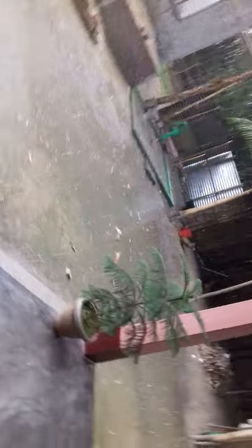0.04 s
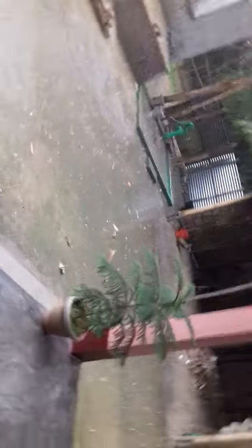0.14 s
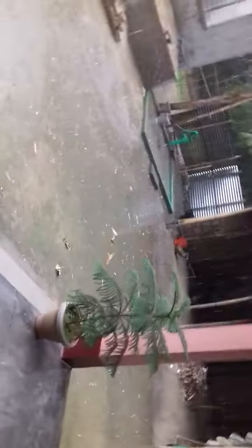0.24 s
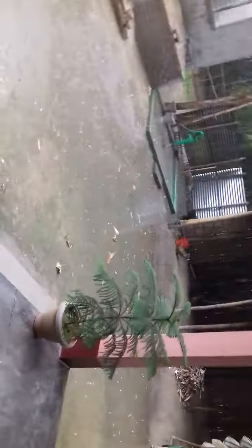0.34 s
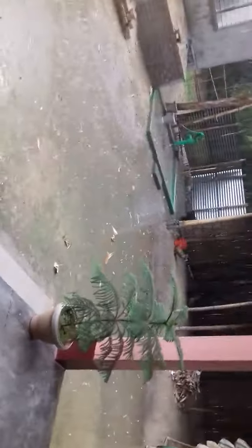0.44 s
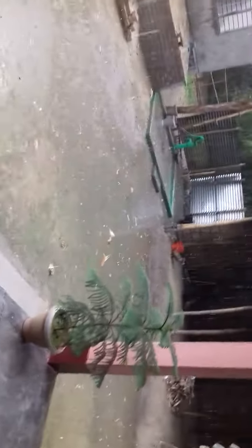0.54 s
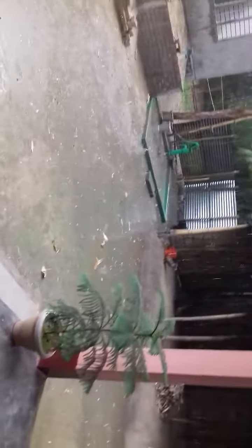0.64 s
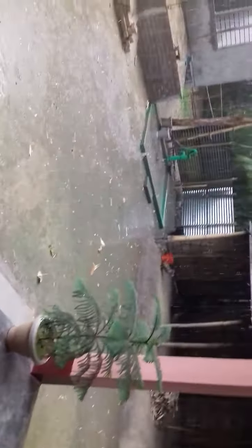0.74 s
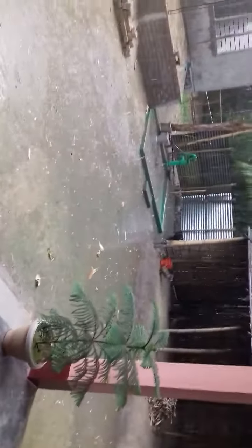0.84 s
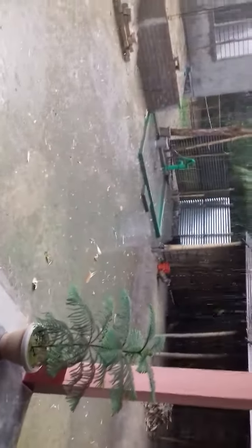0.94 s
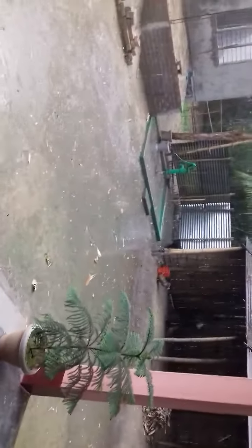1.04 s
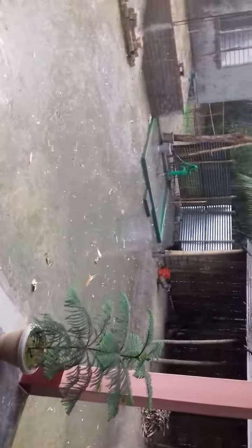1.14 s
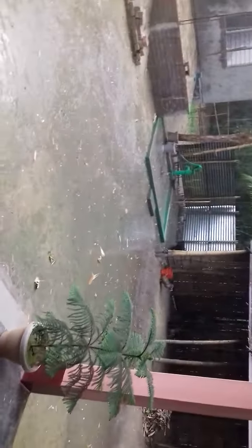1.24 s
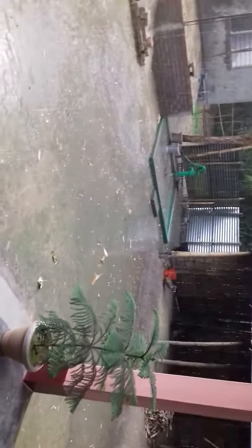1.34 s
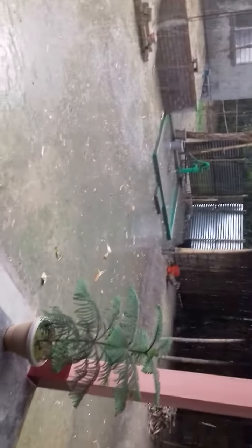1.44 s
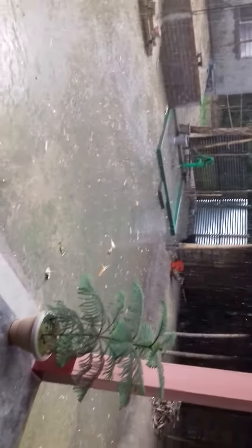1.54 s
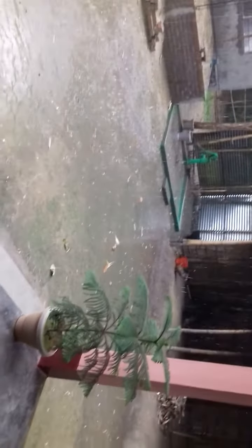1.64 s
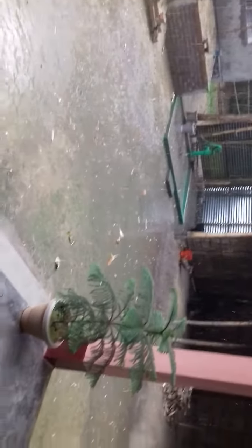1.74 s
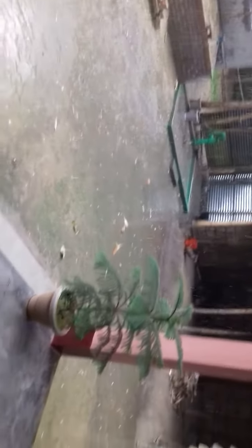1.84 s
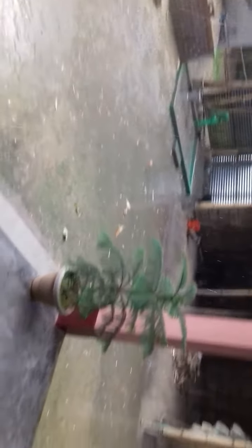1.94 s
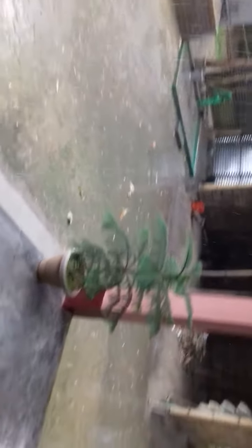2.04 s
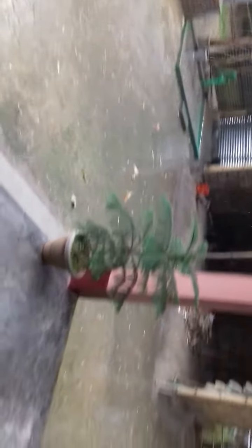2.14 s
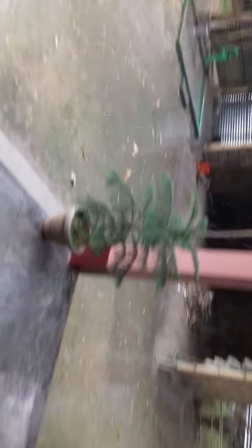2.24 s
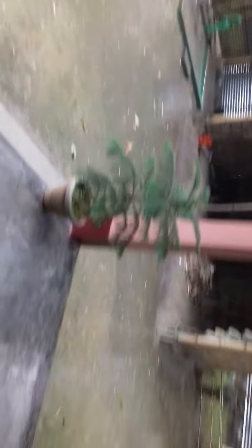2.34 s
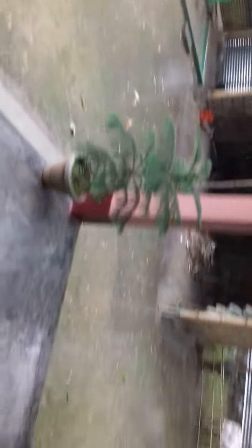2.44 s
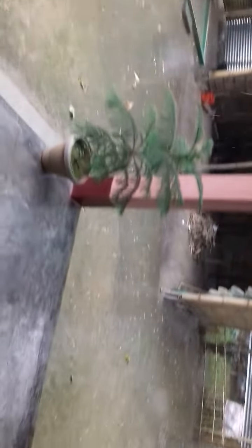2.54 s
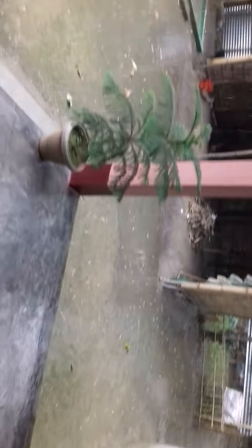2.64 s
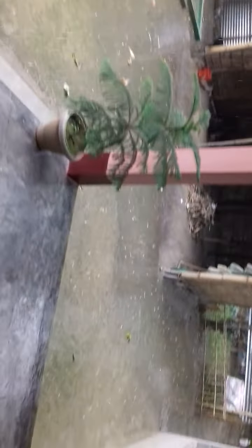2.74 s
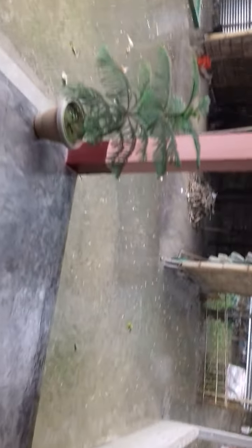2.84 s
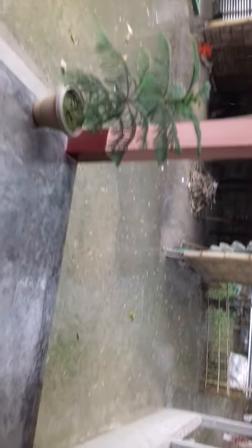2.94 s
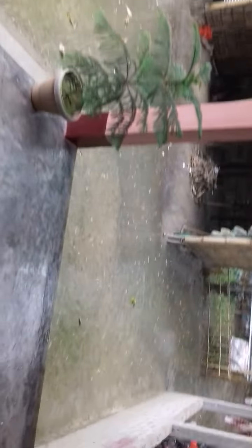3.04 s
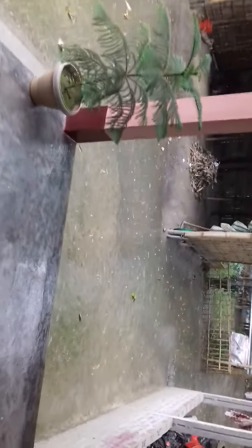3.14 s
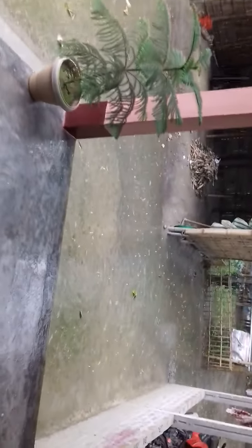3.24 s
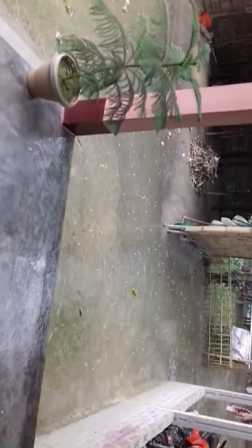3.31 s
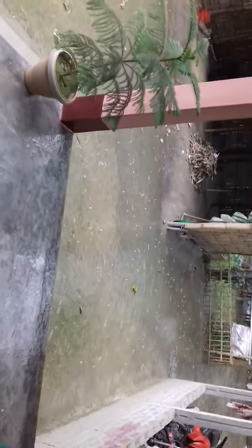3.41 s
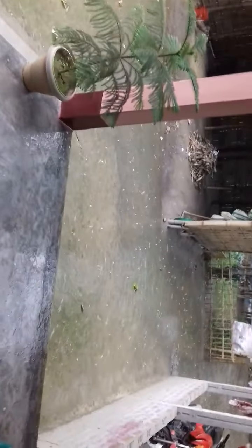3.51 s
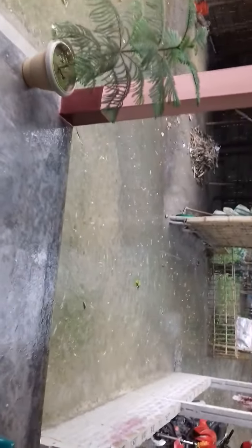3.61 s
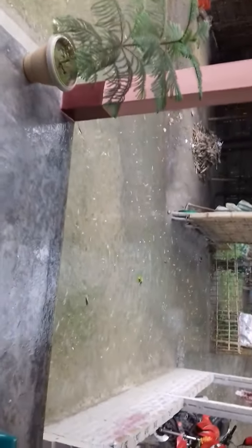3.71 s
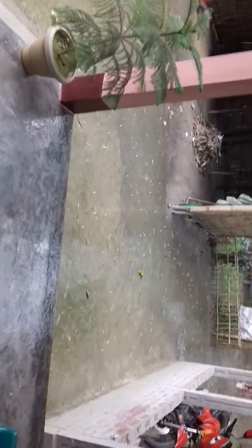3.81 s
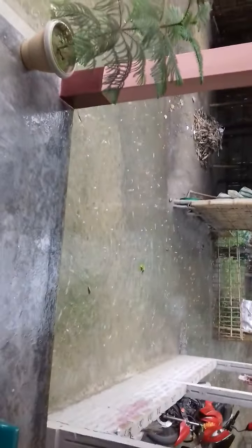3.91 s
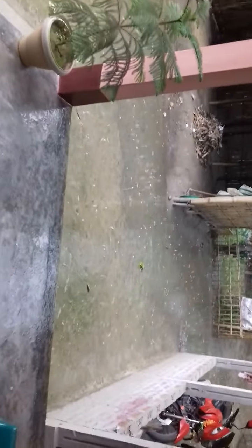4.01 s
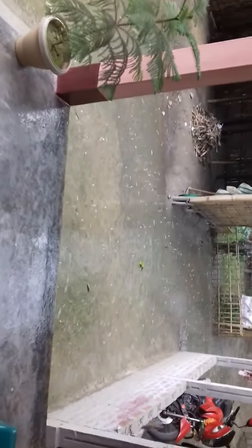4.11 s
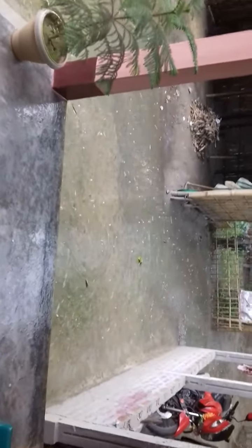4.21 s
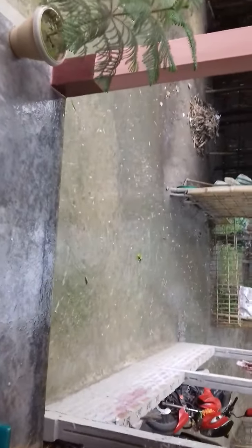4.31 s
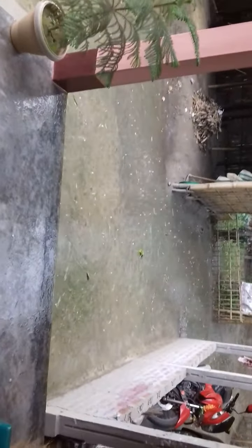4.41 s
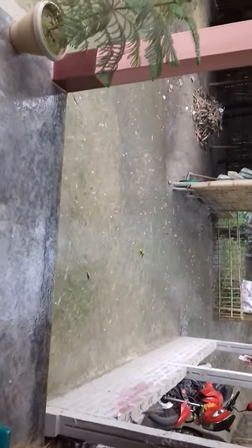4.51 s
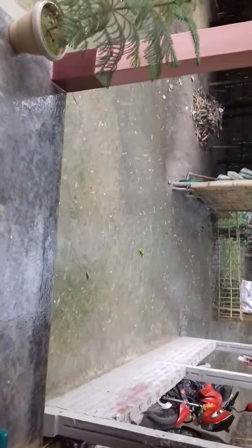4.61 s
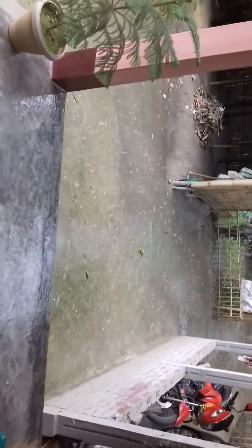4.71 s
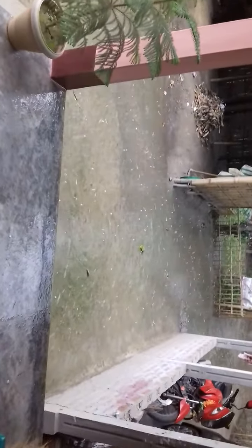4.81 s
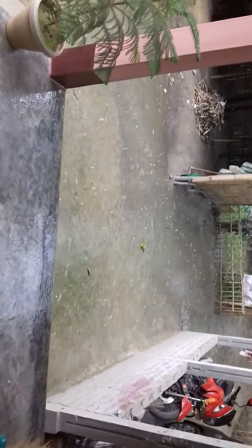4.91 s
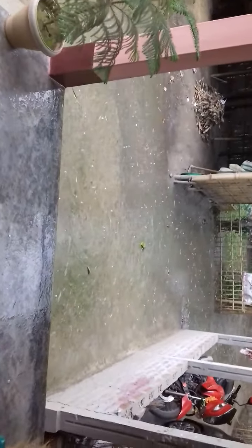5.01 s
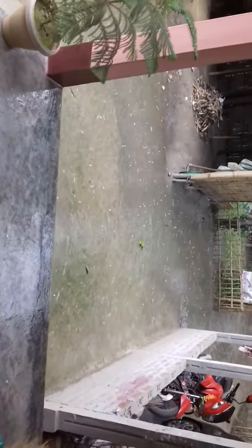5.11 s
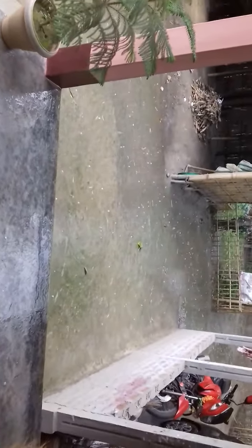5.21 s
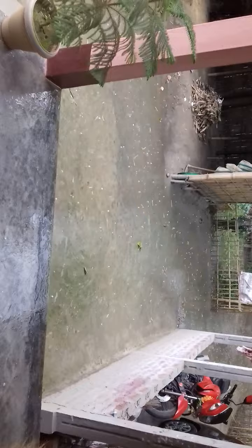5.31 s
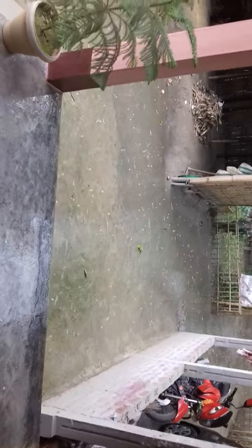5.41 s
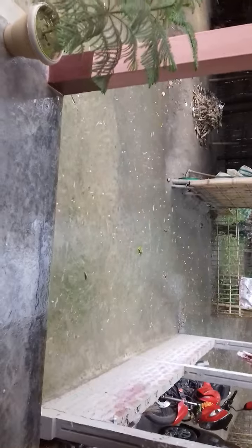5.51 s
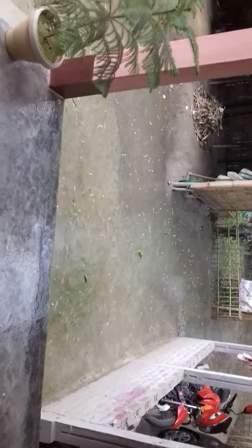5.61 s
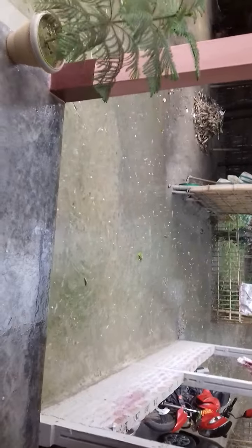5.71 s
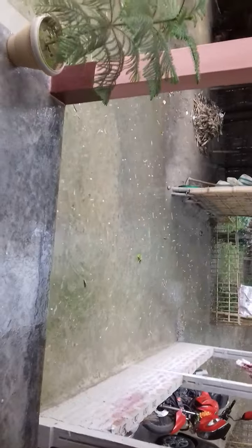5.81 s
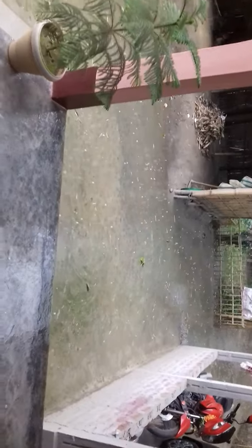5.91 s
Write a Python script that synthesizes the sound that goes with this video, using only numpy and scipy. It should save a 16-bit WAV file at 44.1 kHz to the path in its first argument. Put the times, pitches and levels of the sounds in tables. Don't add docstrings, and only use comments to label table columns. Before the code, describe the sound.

Heavy rain roars steadily while hailstones crack and ring on a sheet-metal roof close overhead, with sharp ticks on concrete and dull thuds beyond.

```python
import sys
import numpy as np
from scipy import signal
from scipy.fft import rfft, irfft, next_fast_len
from scipy.io import wavfile
from scipy.ndimage import uniform_filter1d, minimum_filter1d

SR = 44100
rng = np.random.default_rng(int(sys.argv[2]) if len(sys.argv) > 2 else 0)


def transcribe(u):
    v = np.clip(np.atleast_2d(u).T, -1, 1)
    q = np.round(v * 32767).astype(np.int16)
    wavfile.write(sys.argv[1], SR, q)


def gain_from_db(level_db):
    decades = np.asarray(level_db, float) / 20
    return 10 ** decades


N = 262597
STEP = 4
RATE, STEPS = SR / STEP, -(-N // STEP)


def in_time(rows):
    s, *columns = np.transpose(rows)
    return [np.interp(np.arange(N) / SR, s, c) for c in columns]


def at_hz(points, hz):
    known, *columns = np.transpose(points)
    return [np.interp(np.log(hz), np.log(known), c) for c in columns]


def three_point(body_db, hiss_db, top_db, hz):
    knees_hz = (1800, 5690, 12530)
    body, hiss, top = (np.interp(np.log(hz), np.log(knees_hz), row) for row in np.eye(3))
    return body * (body_db + 4) + hiss * (hiss_db + 1.5) + top * (top_db + 15)


def drift(rate):
    r = np.exp(-80 * np.pi * rate / SR)
    slow = signal.lfilter([1], [1, -2 * r, r * r], rng.standard_normal(N // 40 + 2002))[2000:]
    return np.interp(np.arange(N) / 40, np.arange(len(slow)), slow / slow.std())


def dying(energy, t60):
    return signal.lfilter([1], [1, -gain_from_db(-120 / (t60 * RATE))], energy + 1e-18)


def each_dying(starts, levels_db, t60s):
    out = np.zeros(STEPS)
    after = np.arange(RATE // 4) / RATE
    for start, level_db, t60 in zip((starts * RATE).astype(int), levels_db, t60s):
        fall = np.exp(-np.log(1e6) * after[:STEPS - start] / t60)
        out[start:start + len(after)] += gain_from_db(2 * level_db) * fall
    return out


def swelling(power, seconds):
    r = np.exp(-1 / (max(seconds, 1e-4) * RATE))
    return signal.lfilter([1 - r], [1, -r], power)


def spikes(seconds, level_db):
    out = np.zeros(STEPS)
    np.add.at(out, (seconds * RATE).astype(int), gain_from_db(2 * level_db))
    return out


def mode_bump(hz, mode_hz, bump_db, octaves):
    return bump_db * np.exp(-(np.log2(hz / mode_hz) / octaves) ** 2)


# (t/s, drumming level/dB, fineness of the drops level/dB)
DOWNPOUR = [(.6, -18.5, -4), (.7, -14, -5), (1.4, -14, -4), (1.62, -16.5, -3), (1.816, -27.5, 4),
            (2.05, -19.5, -2.5), (2.3, -16, 0.5), (2.66, -16.5, -3), (2.84, -16, -2), (3.2, -20, -2),
            (3.5, -18.5, -3), (3.8, -20.5, 5.5), (4.14, -20, 2), (4.6, -18.5, -0.5), (5.0, -21.5, 1.5),
            (5.44, -20.5, 0), (5.68, -19.5, 0), (5.95, -16.5, 2.5)]


def rain_levels():
    body_db, fine_db = np.array(in_time(DOWNPOUR))[:, ::STEP]
    hiss_db = body_db - 1.4 + 0.19 * fine_db
    spray_db = body_db - 14.5 + fine_db
    return body_db, hiss_db, spray_db


def pellets(per_s, spread_db):
    sizes_db = spread_db * np.minimum(rng.exponential(1, N), 3)
    falling = (rng.random(N) < per_s / SR) * gain_from_db(2 * sizes_db)
    return np.add.reduceat(falling, np.arange(0, N, STEP))


# (f/Hz, crack t60/s, ring t60/s, swell/s)
STRUCK_SHEET = [
    (150, 0.34, 1, 0.0061),
    (1270, 0.13, 0.33, 0.014),
    (4130, 0.38, 0.58, 0.0012),
    (8000, 0.17, 0.44, 0.00071),
    (13500, 0.13, 0.35, 0.00026),
]


def sheet_at(hz):
    return at_hz(STRUCK_SHEET, hz)


def rain_power(hz, levels_db, small):
    patter = dying(small, 0.47 * sheet_at(hz)[0])
    rain_db = three_point(*levels_db, hz) - 4.0 + 2.0 * drift(7.3)[::STEP]
    clatter_db = 0.34 * np.exp(-np.log2(hz / 3300) ** 2 / .3)
    return gain_from_db(2 * (rain_db + clatter_db)) * (1 + 0.49 * patter / patter.mean())


def hum():
    return gain_from_db(-46 + 2.0 * drift(3)) * np.sin(2 * np.pi * 153.2 * np.arange(N) / SR)


def wind():
    sos = signal.butter(2, [35, 110], "band", fs=SR, output="sos")
    low = signal.sosfilt(sos, rng.standard_normal((2, N)))
    return low / low.std() * gain_from_db(-69 + 4.8 * np.array([drift(5), drift(3.4)]))


# (t/s, peak level/dB, body level/dB, top level/dB)
NEXT_SHEETS = [(.410, -9, -19, -17), (.448, -4.5, -17.5, -23), (.6774, -8, -7.5, -15),
               (1.0924, -17, -24, -11.5), (1.4197, -6, -16, -19), (1.9944, -11, -8, -18),
               (2.101, -6, -15, -13.5), (2.372, -21, -10, -21), (2.5461, -14, -19, -11),
               (3.0036, -12, -17.5, -20), (3.0294, -7, -19, -41), (3.168, -8.5, -18, -21),
               (3.2106, -7, -17, -22), (3.4284, -8.5, -14, -14.5), (3.5884, -11, -8, -20),
               (4.23, -12, -3, -15), (4.7164, -7, -9, -16), (4.8944, -10.5, -9.5, -20),
               (5.0769, -6.5, -11, -24), (5.7824, -7, -12.5, -36.5)]
# (t/s, peak level/dB, body level/dB, top level/dB)
SHEET_OVERHEAD = [(0.59, -3, -18, -17.5), (.7667, -4.5, -31, -28), (.822, -4, -39, -10),
                  (1.195, -2.5, -11, -17), (1.22, -2, -15, -19), (1.2865, -3.5, -8, -17),
                  (1.4675, -3, -20, -45), (1.5647, -3.5, -14.5, -19.5), (1.735, -2, -10, -17.5),
                  (2.2129, -5.5, -8, -11.5), (2.4414, -4, -10.5, -12.5), (2.848, -5.5, -8, -9.5),
                  (3.613, -4.5, -13, -11), (3.6915, -3, -16, -16), (3.7344, -5, -7, -21),
                  (3.9524, -4.5, -12.5, -30), (4.668, -5, -9.5, -16.5), (5.1833, -3.5, -13, -18),
                  (5.232, -5, -10, -16), (5.3281, -2.5, -6.5, -15.5), (5.86, -5, -5.5, -17)]
# (t/s, peak level/dB, body level/dB, top level/dB)
OVER_BEAM = [(.9842, -7.5, -24, -13), (1.6886, -1, -12, -16), (1.8612, -8, -13, -13.5),
             (2.866, -4.5, -11, -8), (3.383, -2.5, -10, -12.5), (3.6707, -2.5, -6, -16),
             (3.7724, -1.5, -11.5, -16), (3.823, -2.5, -8, -14.5), (3.8809, -3, -5.5, -13),
             (3.9124, -18, -26, -31), (4.093, -3.5, -14, -25), (4.186, -4.5, -8.5, -11),
             (4.4014, -5, -14.5, -23), (4.42, -5.5, -26, -13), (4.456, -4, -12, -25),
             (4.4864, -8.5, -19, -13), (4.5714, -8, -7, -14), (5.0394, -14, -12, -14),
             (5.3633, -2, -32, -13.5), (5.6138, -3, -5, -14), (5.7084, -8, -27, -20)]


def stones():
    places = ((SHEET_OVERHEAD, -4), (OVER_BEAM, -30), (NEXT_SHEETS, 1.5))
    return np.array([(*row, ring_db) for rows, ring_db in places for row in rows])


def hail_power(hz, mode_hz, chance_db):
    s, peak_db, body_db, top_db, ring_db = stones().T
    crack_t60, ring_t60, swell = sheet_at(hz)
    force_db = peak_db + 1.06 * np.maximum(peak_db + 8.5, 0)
    level_db = three_point(force_db + body_db - 2.0, force_db - 12.0, force_db + top_db - 6.0, hz)
    level_db = level_db + mode_bump(hz, mode_hz, bump_db=1.0, octaves=.3) + chance_db
    near = peak_db > -5.2
    out = 0
    for group, spread_s in ((near, 0), (~near, .004)):
        crack = spikes(s[group], level_db[group])
        ring = spikes(s[group], (level_db + ring_db)[group])
        tick = 0.91 * dying(crack, 0.016) * (hz > 2000)
        blow = dying(crack, crack_t60) + dying(ring, ring_t60) + tick
        out = out + swelling(blow, swell + spread_s)
    return out


# (t/s, peak level/dB, t60/s)
CONCRETE_TICKS = [(0.5584, -8, 0.06), (2.6984, -11, 0.055), (2.9564, -24, 0.042), (3.3672, -2, 0.06),
                  (3.5593, -6, 0.043), (4.2704, 1, 0.066), (4.302, 1.5, 0.28), (4.3405, -4.5, 0.15),
                  (4.5344, -21, 0.06), (4.6463, -1, 0.065), (4.9874, -7, 0.052), (5.441, -6, 0.06),
                  (5.5223, -5, 0.066), (5.8037, 4, 0.06)]


def tick_power(hz):
    s, peak_db, t60 = np.transpose(CONCRETE_TICKS)
    return each_dying(s, peak_db - 15.0, t60) * gain_from_db(-6 * max(np.log2(5000 / hz), 0))


# (t/s, peak level/dB, loudest body mode f/Hz, mode level/dB, t60/s)
WALL_THUDS = [(.599, -7.5, 2190, 12, 0.49), (0.839, 2, 1010, 1.5, 0.69), (1.294, -2.5, 1660, 8, 0.3),
              (1.34, -5, 1700, 2, .35), (1.599, -15, 2370, 14, 0.66), (1.737, 1.5, 1560, 7.5, 0.49),
              (2.209, -2, 1480, 3, .34), (2.249, -11, 1930, 12, 0.38), (2.699, -19, 2100, 14, 0.9),
              (2.851, 3, 1454, 7, 0.32), (3.465, -14.5, 1200, 13.5, 0.38), (3.599, -8, 2010, 7, .6),
              (3.689, -4.5, 1230, 8, .45), (3.779, -5.5, 1130, 5, 0.54), (3.881, -7, 1020, 11, 0.23),
              (4.713, -4.5, 1134, 18, 0.21), (5.334, -14, 2020, 16.5, 0.74), (5.607, 1, 1070, 9, 0.37)]
# (t/s, peak level/dB, loudest body mode f/Hz, mode level/dB, t60/s)
ROOF_CLACKS = [(1.195, -2, 1120, 2.5, .45), (1.459, 1.5, 2520, 4, 0.32), (1.952, -10.5, 1840, 9.5, 0.74),
               (2.413, -5, 1130, 1, 0.41), (2.457, -5, 1280, 10.5, 0.42), (2.58, -5.5, 1780, 9, .37),
               (3.059, -4.5, 1290, 0.5, 1), (3.249, -4, 980, 7.5, 0.45), (4.189, -9, 2140, 4, .38),
               (5.07, -3.5, 2320, 5.5, 0.5), (5.846, -5, 1850, -1, 0.58)]


def thud_power(hz):
    s, peak_db, mode_hz, mode_db, t60 = np.transpose(ROOF_CLACKS + WALL_THUDS)
    octave_db = np.repeat([-3.5, -6], [len(ROOF_CLACKS), len(WALL_THUDS)])
    far_db = octave_db * max(np.log2(hz / 2400), 0)
    level_db = peak_db - 6.5 + far_db + mode_bump(hz, mode_hz, mode_db, octaves=0.26)
    return swelling(each_dying(s, level_db, t60), 0.0024)


# (f/Hz, level per Hz/dB)
IMPACT_COLOUR = [(30, -53), (60, -39.5), (120, -24.5), (160, -17.5), (300, -11.5), (550, -4.5), (1200, 0),
                 (2400, -2.5), (2950, -5.5), (5500, -9), (8000, -7), (12000, -12.5), (14200, -22),
                 (16000, -21)]


def coloured(x):
    size = next_fast_len(N)
    hz = np.maximum(np.fft.rfftfreq(size, 1 / SR), 1)
    return irfft(rfft(x, size) * gain_from_db(at_hz(IMPACT_COLOUR, hz)[0]), size)[:N]


def scene():
    levels_db = rain_levels()
    small = pellets(per_s=90, spread_db=2.2)
    edges = 35 * 2 ** np.arange(0, 9.1, 1 / 3)
    white = rng.standard_normal((2, N))
    chance = rng.standard_normal((len(stones()), len(edges)))
    modes_hz = 960 * (2610 / 960) ** np.clip(.5 + chance[:, -1] / 4, 0, 1)
    out, plain = 0, 0
    for k, (low, high) in enumerate(zip(edges, edges[1:])):
        hz = np.sqrt(low * high)
        sos = signal.butter(2, [low, high], "band", fs=SR, output="sos")
        band = signal.sosfilt(sos, white[k % 2])
        power = rain_power(hz, levels_db, small)
        power = power + hail_power(hz, modes_hz, 0.83 * chance[:, k])
        power = power + tick_power(hz) + thud_power(hz)
        out = out + band * np.repeat(np.sqrt(power), STEP)[:N]
        plain = plain + band
    impacts = coloured(out) / coloured(plain).std()
    return np.tile(impacts + hum(), (2, 1)) + wind()


def port(x, hz, width_hz, peak_db):
    r = np.exp(-np.pi * width_hz / SR)
    turn = 2 * r * np.cos(2 * np.pi * hz / SR)
    peak = signal.lfilter([(1 - r * r) / 2, 0, (r * r - 1) / 2], [1, -turn, r * r], x)
    return x + (gain_from_db(peak_db) - 1) * peak


def limiter(x, threshold_db, share, ahead_s, release_db_s):
    level_db = 10 * np.log10(uniform_filter1d(np.mean(x ** 2, axis=0), size=200) + 1e-12)
    cut_db = share * np.maximum(level_db - threshold_db, 0)
    ramp = release_db_s * np.arange(N) / SR
    cut_db = np.maximum.accumulate(cut_db + ramp) - ramp
    ahead = int(ahead_s * SR)
    early = -minimum_filter1d(-cut_db, size=ahead, origin=-(ahead // 2))
    return x * gain_from_db(-uniform_filter1d(early, size=ahead, origin=(ahead - 1) // 2))


# (t/s, length/s, left samples, right samples that wrap round)
OVERLOADS = [(0.8396, 0.0015, 0, 1), (1.1974, 0.0052, 0, 3), (1.2204, 0.0055, 1, 6), (1.6891, 0.0126, 2, 9),
             (1.7374, 0.0055, 0, 3), (2.8511, 0.0015, 0, 1), (2.8639, 0.015, 1, 9), (3.3841, 0.0081, 0, 14),
             (3.6917, 0.0121, 0, 5), (3.7743, 0.0068, 0, 8), (3.8239, 0.0067, 0, 4), (3.8837, 0.0068, 1, 1),
             (4.4237, 0.0024, 0, 2), (5.1834, 0.0017, 0, 2), (5.3306, 0.0121, 1, 14),
             (5.3646, 0.0058, 2, 3), (5.6213, 0.0083, 1, 4), (2.4415, .004, 1, 4)]


def overflow(x, jump, samples_each, linger, thump):
    clicks, offset = np.zeros_like(x), np.zeros(N)
    for s, length, *wraps in OVERLOADS:
        start, stop = int(s * SR), int((s + length) * SR)
        offset[(start + stop) // 2] = thump * np.sqrt(sum(wraps))
        for side, click, count in zip(x, clicks, wraps):
            highest = start + np.argsort(-np.abs(side[start:stop]))[:int(count * samples_each)]
            click[highest] = -jump * np.sign(side[highest])
    clicks = signal.lfilter([1], [1, -linger], clicks + 1e-18)
    clicks = signal.sosfilt(signal.butter(2, 170, "high", fs=SR, output="sos"), clicks)
    low_band = signal.butter(2, [45, 170], "band", fs=SR, output="sos")
    settling = signal.sosfilt(low_band, offset + 1e-18)
    return x + clicks + settling * gain_from_db(np.array([[-3], [.1]]))


# (t/s, level/dB)
OPENING = [
    (.343, -61),
    (.351, -25.5),
    (.4, -14.5),
    (.45, -11.5),
    (.5, -4),
    (.6, -1.5),
]


def fade_in(x):
    return x * gain_from_db(in_time(OPENING)[0]) * (np.arange(N) > OPENING[0][0] * SR)


def roll_off(x):
    return signal.sosfilt(signal.butter(12, 16520, fs=SR, output="sos"), x)


def record(dry):
    both = port(dry, hz=8460, width_hz=724, peak_db=14.1)
    left, right = both
    left = port(left, hz=8150, width_hz=870, peak_db=-9)
    x = gain_from_db(-2.5) * np.array([left, right])
    x = limiter(x, threshold_db=-15.5, share=0.42, ahead_s=0.017, release_db_s=62)
    x = overflow(x, jump=1.35, samples_each=1.5, linger=.3, thump=1.15)
    x = fade_in(x)
    x = signal.sosfilt(signal.ellip(8, .2, 34, 15680, fs=SR, output="sos"), x)
    mix = np.clip(x, -1, 1)
    return roll_off(mix)


dry = scene()
out = record(dry)
transcribe(out)
```